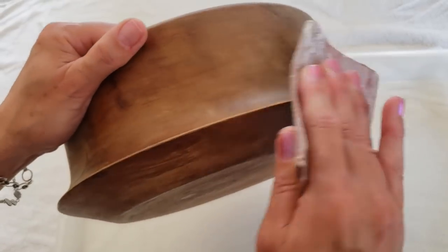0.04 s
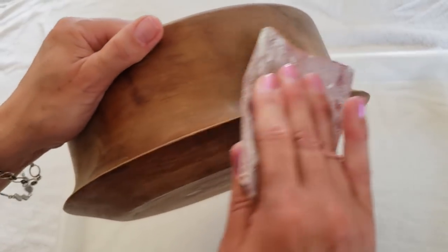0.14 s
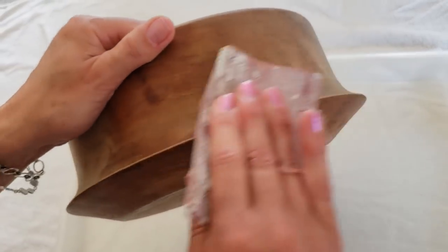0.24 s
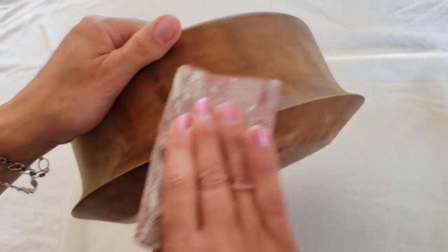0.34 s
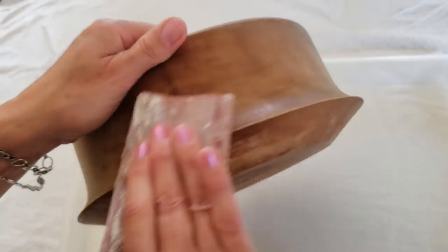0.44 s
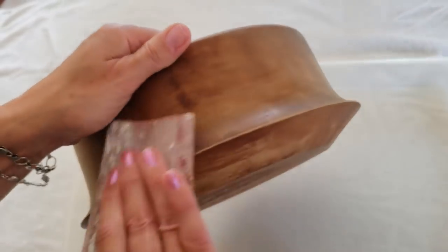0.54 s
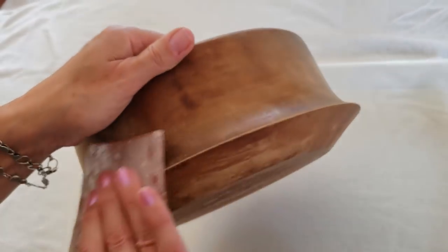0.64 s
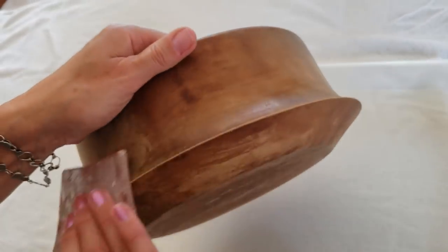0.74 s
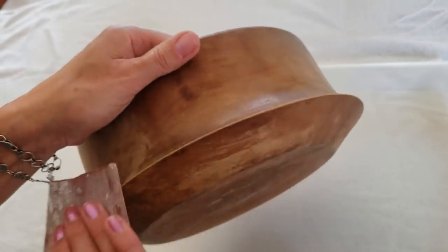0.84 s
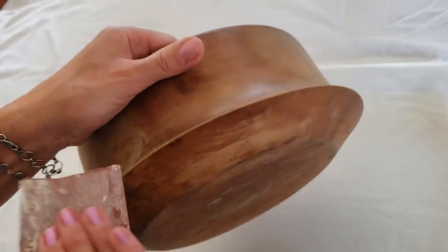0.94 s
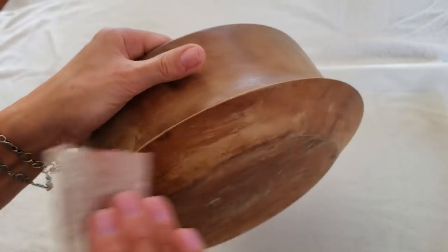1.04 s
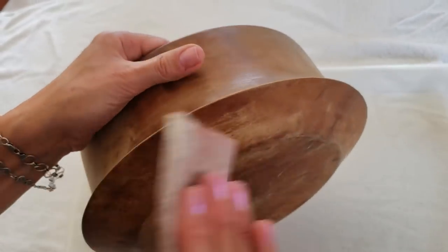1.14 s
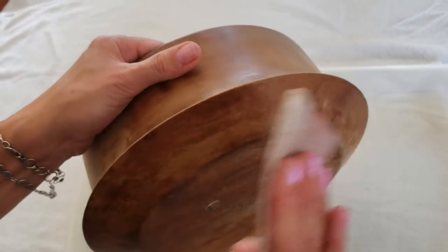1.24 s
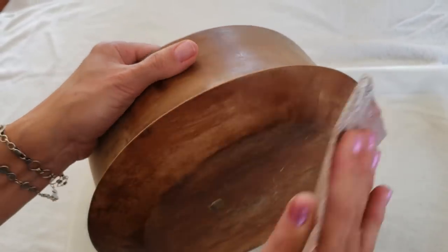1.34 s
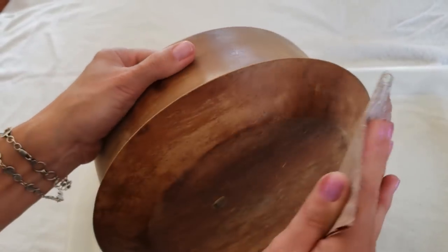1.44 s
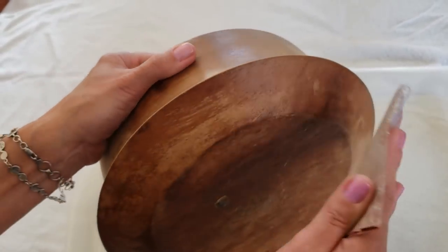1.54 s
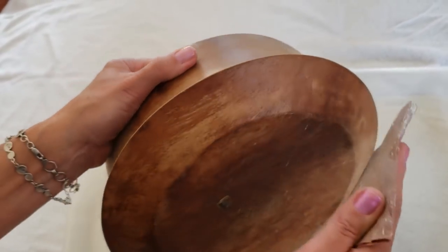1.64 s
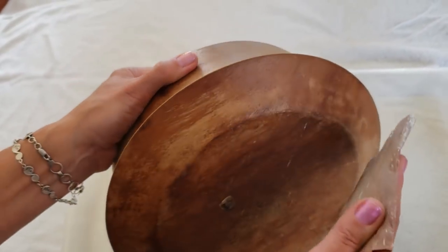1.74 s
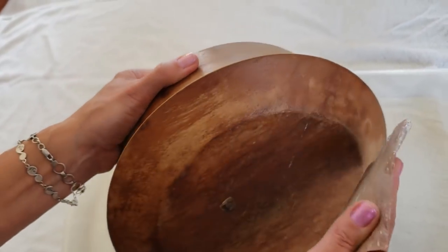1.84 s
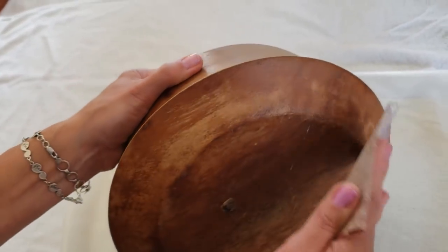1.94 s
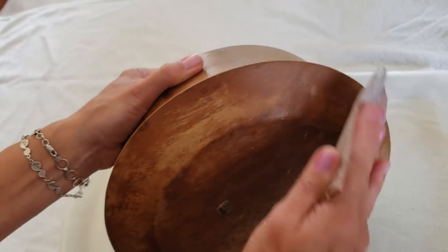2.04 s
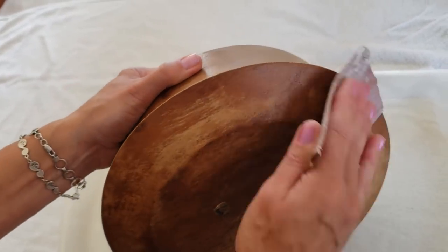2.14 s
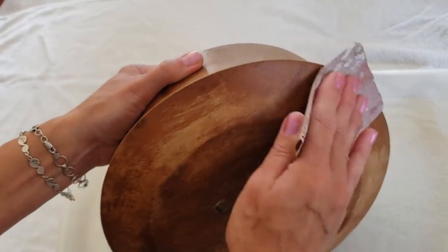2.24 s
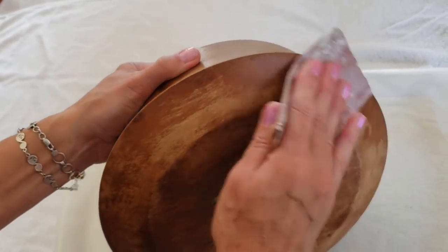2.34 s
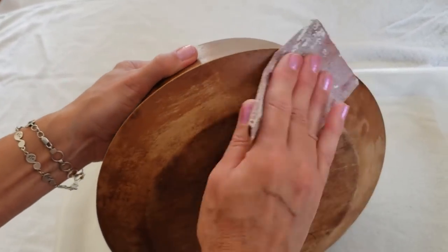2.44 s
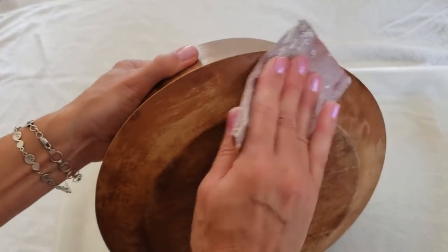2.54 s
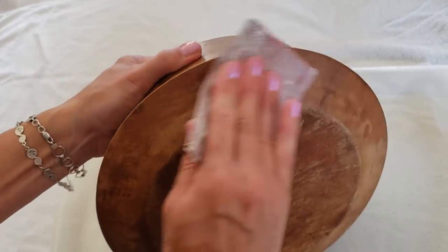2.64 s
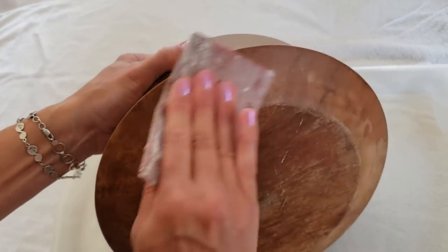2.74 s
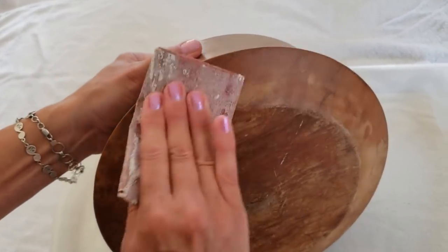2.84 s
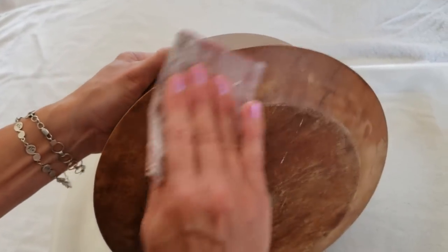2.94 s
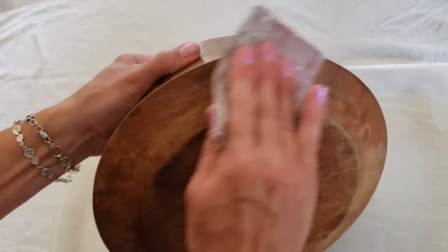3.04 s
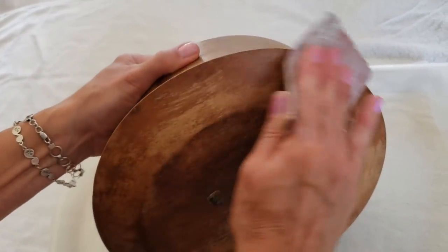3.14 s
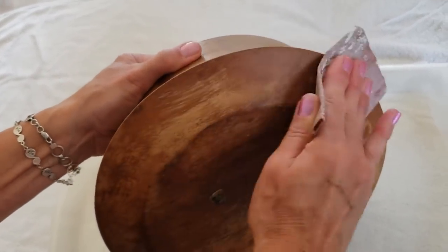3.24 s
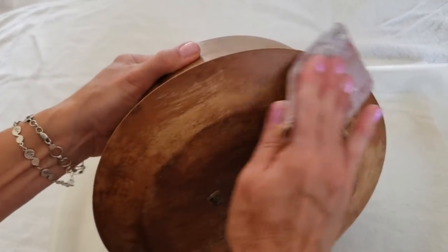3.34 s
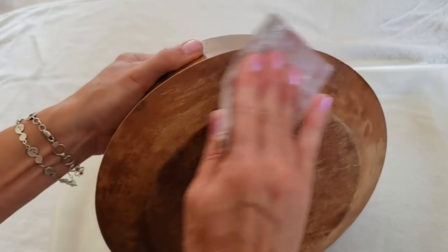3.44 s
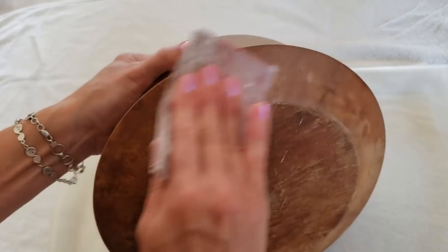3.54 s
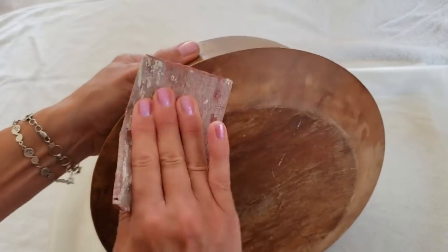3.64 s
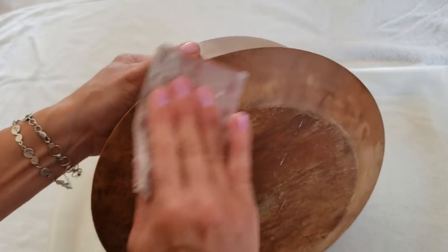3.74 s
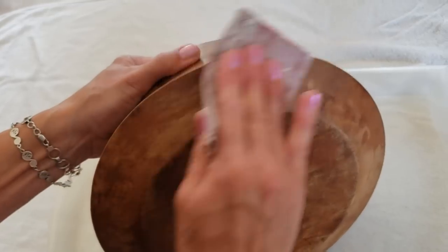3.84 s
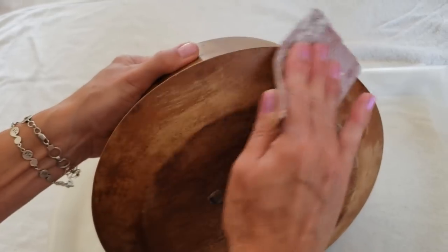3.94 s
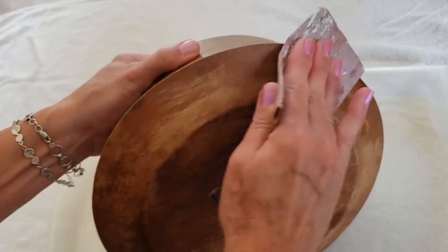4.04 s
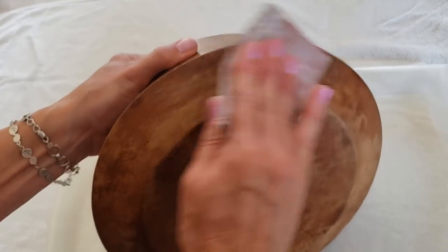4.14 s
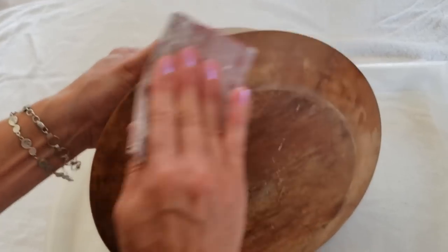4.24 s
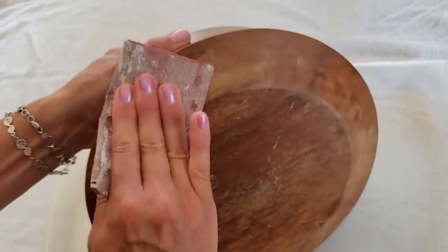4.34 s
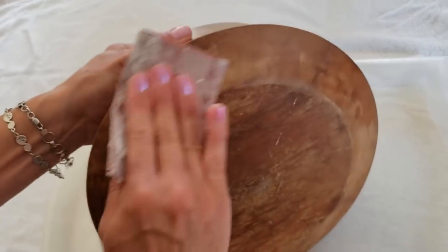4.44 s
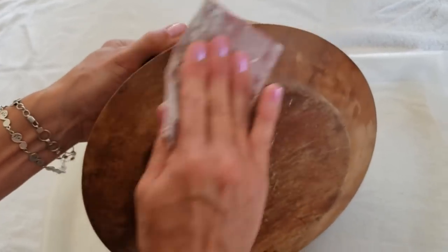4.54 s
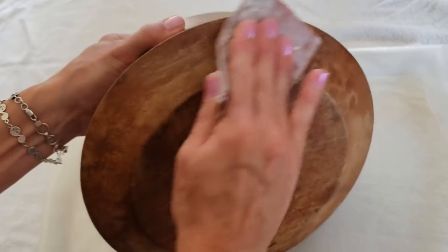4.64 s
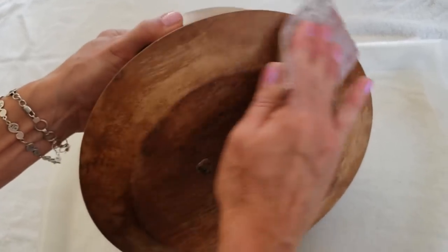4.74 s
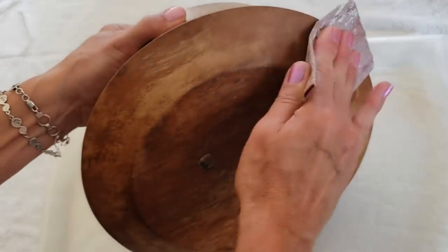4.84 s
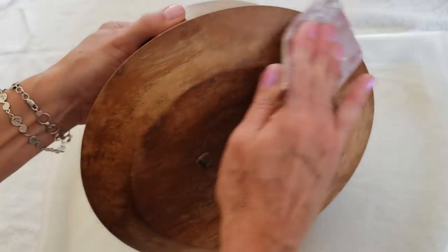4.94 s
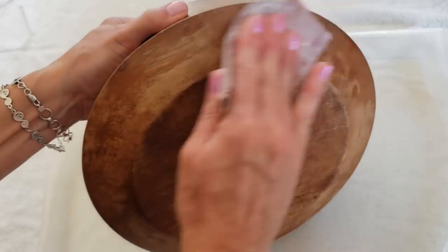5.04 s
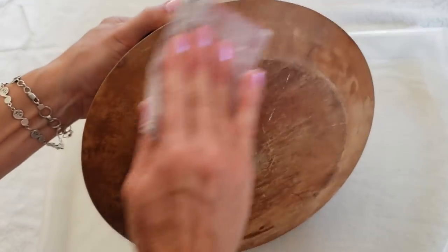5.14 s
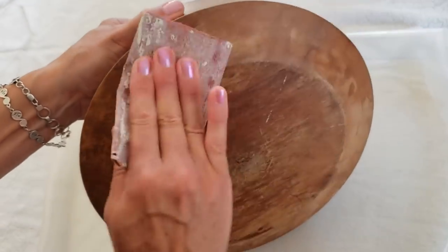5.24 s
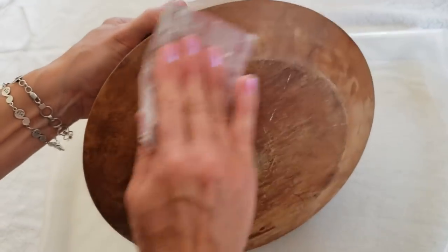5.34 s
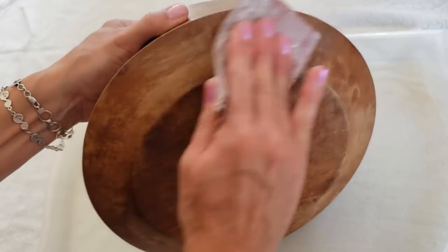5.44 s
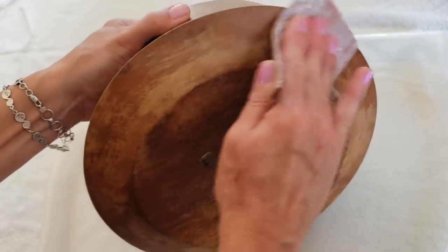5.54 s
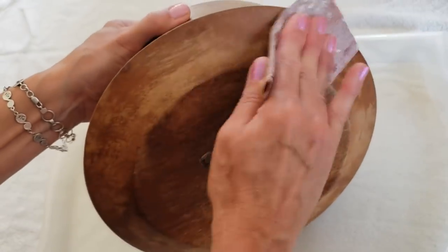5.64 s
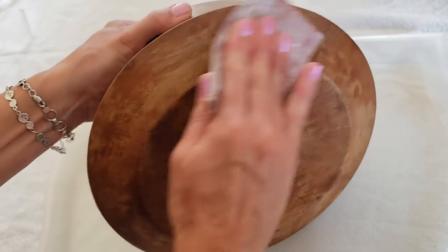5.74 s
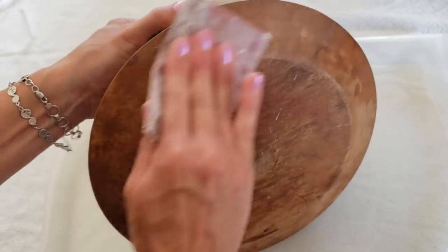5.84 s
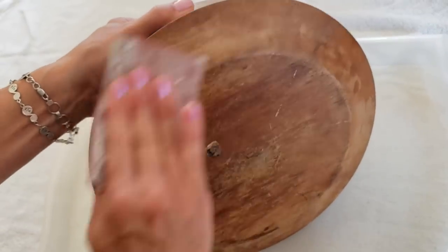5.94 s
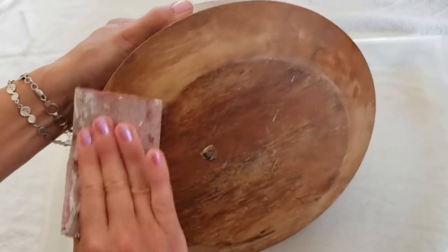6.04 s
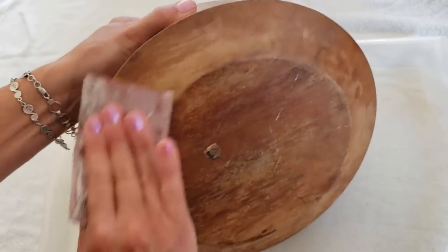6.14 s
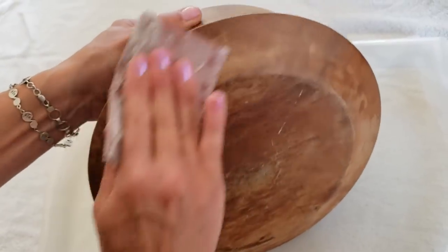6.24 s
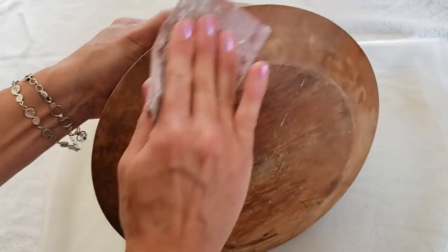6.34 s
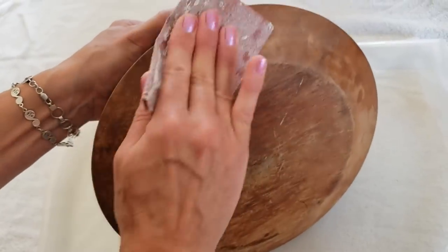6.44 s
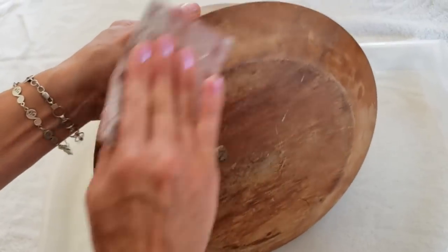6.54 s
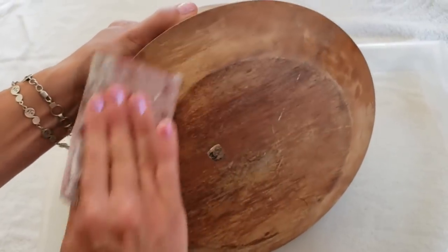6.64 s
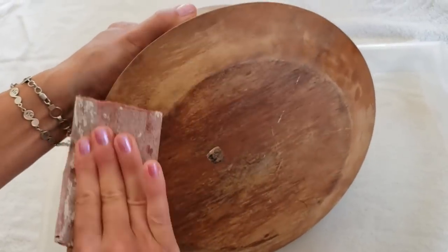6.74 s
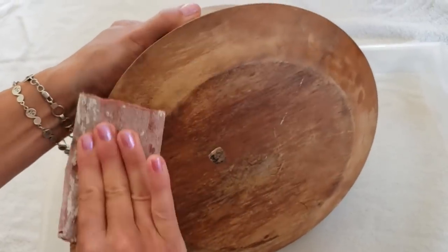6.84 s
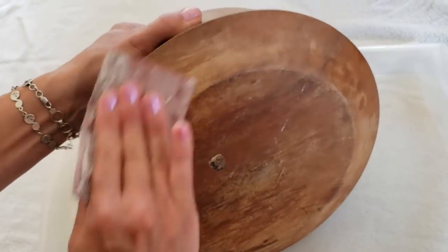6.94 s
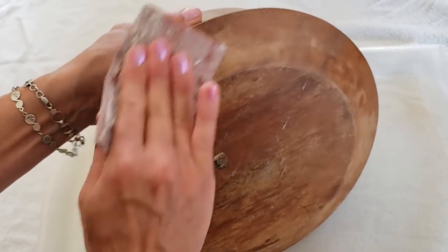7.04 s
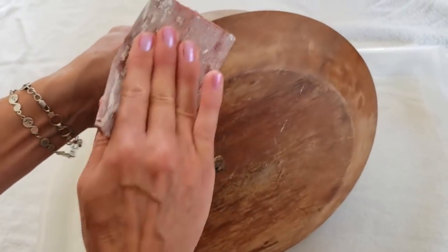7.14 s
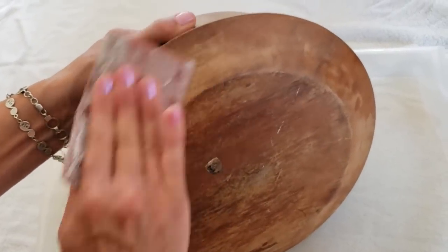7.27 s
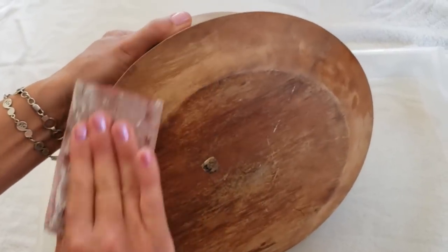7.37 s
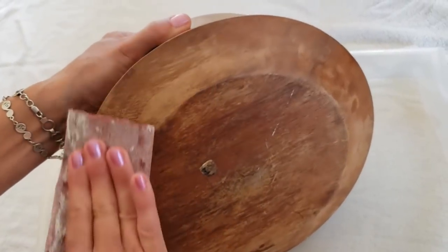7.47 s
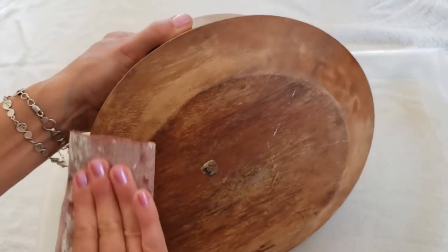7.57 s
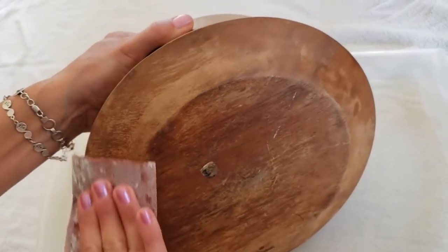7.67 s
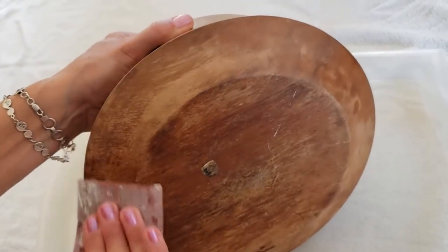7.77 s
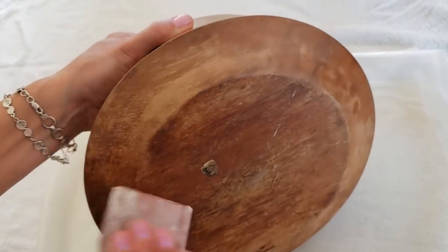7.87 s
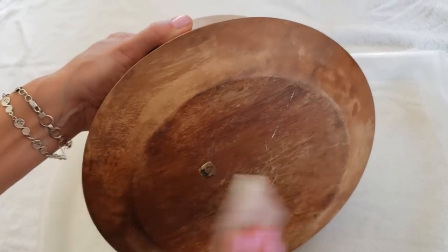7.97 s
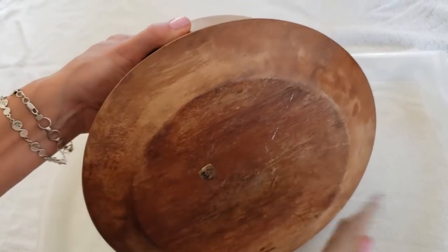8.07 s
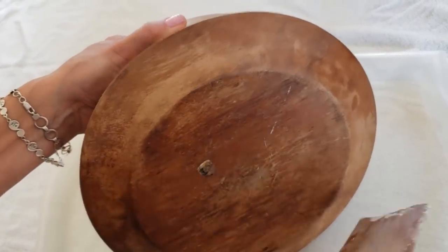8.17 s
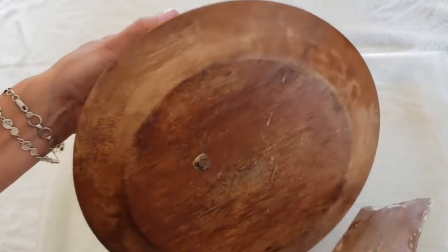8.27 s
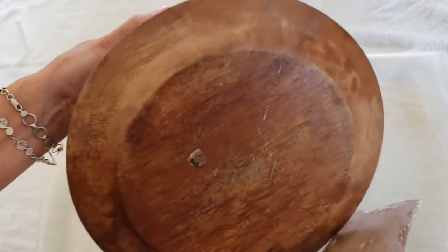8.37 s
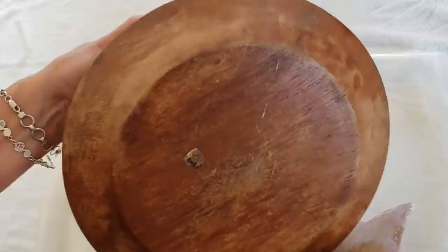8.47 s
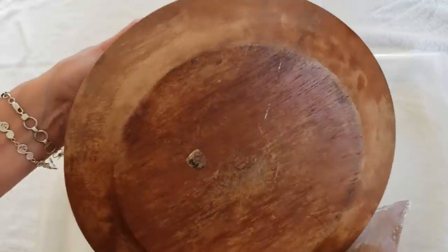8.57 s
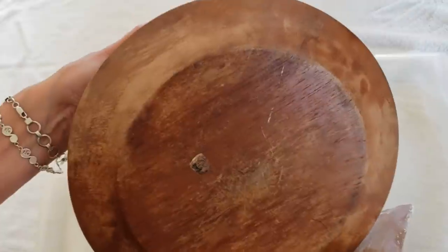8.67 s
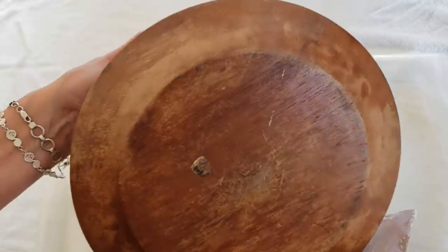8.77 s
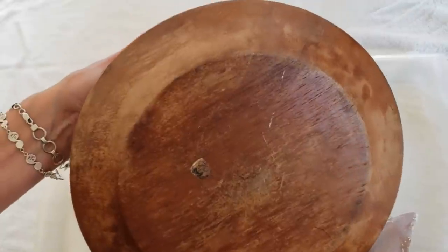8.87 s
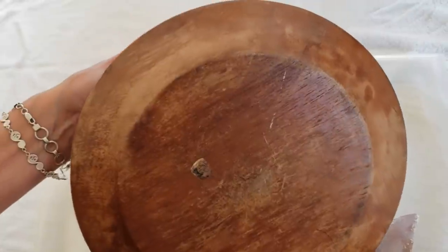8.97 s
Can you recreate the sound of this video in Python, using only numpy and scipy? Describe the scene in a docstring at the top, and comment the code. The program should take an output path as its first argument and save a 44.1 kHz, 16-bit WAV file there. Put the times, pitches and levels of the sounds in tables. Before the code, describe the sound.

Sandpaper rubs a wooden bowl by hand: one light pass, a pause, then quick, firm rasping strokes back and forth in a quiet room.

```python
"""A quiet room, stereo microphone close to a wooden bowl that is being sanded by hand.
One light pass, a pause in which the bowl is turned and bumps twice, then firm strokes to and fro along
the rim and a light pass off the edge; at the end the holding fingers slide on the wood. Grains of grit
catch and let go, driving the resonances of bowl and sheet; under the rasp lie the rumble of the hands,
room air, microphone hiss and a faint hum."""
import sys
import numpy as np
from scipy import signal
from scipy.fft import rfft, irfft, next_fast_len
from scipy.io import wavfile
from scipy.ndimage import uniform_filter1d, map_coordinates

SR = 44100
rng = np.random.default_rng(int(sys.argv[2]) if len(sys.argv) > 2 else 0)


def log_audio(samples):
    """Write samples as a 16-bit WAV file to the path given in sys.argv[1]."""
    # one column per channel
    frames = np.atleast_2d(samples).T
    # limit to full scale, then quantise
    limited = np.clip(frames, -1, 1)
    pcm = np.round(limited * 32767).astype(np.int16)
    wavfile.write(sys.argv[1], SR, pcm)


N = 397341
TIME = np.arange(N) / SR
SIZE = next_fast_len(N + SR // 2)
HZ = np.maximum(np.fft.rfftfreq(SIZE, 1 / SR), 1)


def from_db(db):
    """Decibels to gain."""
    return 10 ** (np.asarray(db) / 20)


def rms_one(x):
    """Scale so that the mean of the two channels has rms 1."""
    return x / np.sqrt(np.mean(x.mean(axis=0) ** 2) + 1e-20)


def in_time(rows):
    """Every column of a curve, sample by sample."""
    times, *columns = np.transpose(rows)
    return [np.interp(TIME, times, column) for column in columns]


def over_hz(rows):
    """Every column of a spectrum, joined on a log-frequency axis."""
    hz, *columns = np.transpose(rows)
    return np.array([np.interp(np.log(HZ), np.log(hz), column) for column in columns])


def resonance(hz, width):
    """Response of one damped mode, 1 at its peak."""
    return 1 / (1 + 1j * (HZ ** 2 - hz ** 2) / (HZ * width))


def below(hz, order):
    """Gain of a low-pass."""
    return 1 / np.sqrt(1 + (HZ / hz) ** (2 * order))


def above(hz, order):
    """Gain of a high-pass."""
    return 1 / np.sqrt(1 + (hz / HZ) ** (2 * order))


def shape(x, response):
    """Filter by a frequency response."""
    return irfft(rfft(x, SIZE) * response, SIZE)[..., :N]


def glide(x, hz, width, block=256):
    """Filter by a resonance whose centre moves, gain 1 at its peak."""
    radius = np.exp(-np.pi * width / SR)
    out, state = np.zeros_like(x), np.zeros((2, 2))
    for i in range(0, N, block):
        poles = [1, -2 * radius * np.cos(2 * np.pi * hz[i] / SR), radius ** 2]
        out[:, i:i + block], state = signal.lfilter([1, 0, -1], poles, x[:, i:i + block], zi=state)
    return out * (1 - radius ** 2) / 2


def level_evened(x):
    """Hold the level steady over 0.1 s, so that a resonance changes only the colour."""
    return x / np.sqrt(uniform_filter1d(np.mean(x ** 2, axis=0), SR // 10) + 1e-9)


def drift(rate_hz):
    """Slow random wander with spread 1."""
    slow = shape(rng.standard_normal(N), below(rate_hz, order=2))
    return slow / slow.std()


def pan(left_db):
    """Channel gains that put the left side left_db above the right."""
    return from_db(np.array([[.5], [-.5]]) * left_db)


def stereo(x, likeness):
    """Mix two unrelated signals into a left and a right that are partly alike."""
    return np.sqrt(1 + likeness) * x[0] + np.sqrt(1 - likeness) * x[1] * [[1], [-1]]


# Noise floor of room and microphone: f/Hz, relative level/dB
FLOOR_SPECTRUM = [(18, -45.5), (30, -20.5), (55, -1), (85, -8.5), (114, -11.5), (182, -15), (213, 2),
                  (256, -15), (359, -16), (389, -9.5), (622, -24.5), (1640, -23.5), (2240, -27.5),
                  (8500, -32), (15500, -26.5)]
# Its lean to the left: f/Hz, left over right/dB
FLOOR_BALANCE = [(60, 8.8), (240, 18), (950, 8.5), (3770, 5.9), (15000, 3.0)]
# Faint steady bands of microphone hiss near 1650 and 3650 Hz, plus a low band at 340 Hz:
# f/Hz, width/Hz, lift/dB
MIC_NOISE_BANDS = [(340, 70, 2), (1650, 200, 11), (3650, 600, 8)]


def noise_floor(level_db=-72.5):
    """The steady low rumble of room air under faint microphone hiss."""
    colour = from_db(over_hz(FLOOR_SPECTRUM)) * pan(over_hz(FLOOR_BALANCE))
    for hz, width, db in MIC_NOISE_BANDS:
        colour = colour * (1 + (from_db(db) - 1) * resonance(hz, width))
    noise = stereo(rng.standard_normal((2, N)), likeness=0.23)
    return from_db(level_db) * rms_one(shape(noise, colour))


# Hum in the room: f/Hz, level before trim/dB
HUM_TONES = [(118.4, -86), (215.3, -94), (355.3, -83)]


def hum(trim_db=-1.5, waver_db=5.5):
    """Faint low tones, each wavering in level and phase."""
    tones = np.zeros(N)
    for hz, db in HUM_TONES:
        amplitude = np.sqrt(2) * from_db(db + trim_db + waver_db * drift(3))
        tones += amplitude * np.sin(2 * np.pi * hz * TIME + .7 * drift(2.5))
    return tones * pan(4.9)


def room_tail(x, wet_db=-19, t60=0.23, dull_hz=5000):
    """The room answers with a short, dull tail, different on each side."""
    age = TIME[:SR // 2]
    tail = rng.standard_normal((2, len(age))) * from_db(-60 * age / t60) * (age > .005)
    tail /= np.sqrt(np.sum(tail ** 2, axis=1, keepdims=True))
    return from_db(wet_db) * shape(x, rfft(tail, SIZE) * below(dull_hz, order=1))


# The holding hand shifts its grip: t/s, half-width/s, rumble/dB, drag/dB (both before trim)
GRIP_SWELLS = [(.3, 0.046, -70, -80), (.76, 0.059, -71, -62.5), (1.01, 0.018, -68, -56.5),
               (1.25, 0.13, -68.5, -87), (1.75, 0.061, -71, -88), (2.1, 0.13, -66, -86),
               (2.42, 0.074, -61, -64), (4.3, 0.076, -68, -65.5), (6.91, 0.018, -61.5, -73),
               (7.68, 0.11, -68, -61.5), (7.95, 0.04, -67, -92), (8.5, 0.083, -72.5, -70),
               (8.9, 0.48, -74, -75.5)]


def handling(stroke_drag_db, hold_db=-77, rumble_trim_db=-2, drag_trim_db=-0.5, lumpy_db=2.5):
    """The hands shake the whole bowl: a lumpy rumble and a dull drag, swelling as the grip shifts."""
    rumble_power, drag_power = from_db(hold_db) ** 2, from_db(stroke_drag_db) ** 2
    for t, width, rumble_db, drag_db in GRIP_SWELLS:
        swell = np.exp(-((TIME - t) / width) ** 2)
        rumble_power = rumble_power + swell * from_db(rumble_db) ** 2
        drag_power = drag_power + swell * from_db(drag_db) ** 2
    shake = stereo(rng.standard_normal((2, N)), likeness=.6) * from_db(lumpy_db * drift(15))
    rumble = rms_one(shape(shake, above(43, order=3) * below(150, order=2)) * pan(9))
    body = (0.31 + 0.52 * resonance(334, 110) - resonance(523, 100)
            + 0.64 * resonance(768, 120) - 1.39 * resonance(960, 130))
    drag = rms_one(shape(shake, above(220, order=2) * below(1100, order=4) * body) * pan(16.6))
    return (rumble * np.sqrt(rumble_power) * from_db(rumble_trim_db)
            + drag * np.sqrt(drag_power) * from_db(drag_trim_db))


# The bowl bumps as it is turned, left of the microphone: t/s, relative level/dB
BOWL_BUMPS = [(1.803, -44), (1.921, -52)]
# What a bump sets ringing: f/Hz, relative level/dB, t60/s
KNOCK_MODES = [(87, 0.5, 0.59), (125, 2, 0.37), (214, -3, 0.3), (270, -7.5, 0.47), (474, 6, 0.067),
               (630, 1.5, 0.15), (783, 0.5, 0.12), (1080, -15, .1), (1505, 1, 0.043), (2120, -19, .08),
               (2360, -15, .08)]


def bumps(ring_db=-9, thud_db=-11, thud_t60=0.28, thud_hz=2200):
    """Dull knocks: decaying modes and a short, muffled thud."""
    out = np.zeros((2, N))
    age = TIME[:SR // 2]
    muffle = signal.butter(6, thud_hz, fs=SR, output="sos")
    for t, db in BOWL_BUMPS:
        ring = sum(from_db(mode_db - 60 * age / t60) * np.sin(2 * np.pi * hz * age) * rng.choice([-1, 1])
                   for hz, mode_db, t60 in KNOCK_MODES)
        noise = rms_one(signal.sosfilt(muffle, rng.standard_normal((2, len(age)))))
        thud = noise * from_db(thud_db - 60 * age / thud_t60)
        start = int(t * SR)
        out[:, start:start + len(age)] += from_db(db) * (from_db(ring_db) * ring + thud)
    return out * pan(8.5)


def grit(per_s, spread_db):
    """Grains catch and let go at random, each with its own force; the same power at any rate."""
    chance = np.clip(per_s / SR, .001, 1)
    force = from_db(spread_db * np.minimum(rng.exponential(1, (2, N)), 4))
    direction = rng.choice([-1, 1], (2, N))
    caught = rng.random((2, N)) < chance
    return rms_one(force * direction * caught / np.sqrt(chance))


def brush(curve, peaks, per_s, spread_db, left_db, likeness, top_hz, fade_s=0.0091):
    """A light sliding touch: sparse tiny slips excite a few resonances with dark valleys between."""
    level_db, = in_time(curve)
    inside_s = np.minimum(TIME - curve[0][0], curve[-1][0] - TIME)
    gate = np.clip(1 + inside_s / fade_s, 0, 1)
    body = sum(from_db(db) * resonance(hz, width) for hz, width, db in peaks)
    slips = stereo(grit(per_s, spread_db), likeness)
    sound = shape(slips, body * below(top_hz, order=2) * above(590, order=2))
    return rms_one(sound * pan(left_db)) * from_db(level_db) * gate


# Fingers on the bowl after the last stroke: t/s, level/dB
FINGER_LEVEL = [(8.41, -52), (8.418, -67), (8.436, -48), (8.578, -54.5), (8.702, -76), (8.706, -67),
                (8.792, -82), (9.0, -78)]
# The resonances they excite: f/Hz, width/Hz, relative level/dB
FINGER_MODES = [(1215, 150, 4.5), (1630, 67, 4.5), (2310, 950, -8), (3040, 610, -1), (3760, 410, -8),
                (5080, 730, -7), (6860, 280, -30), (12300, 4600, -21)]


def finger_slide():
    """The holding fingers slip over the wood."""
    return brush(FINGER_LEVEL, FINGER_MODES, per_s=3200, spread_db=3.5,
                 left_db=4.5, likeness=0.19, top_hz=10270)


# The paper's touch just before the firm strokes: t/s, level/dB
GRAZE_LEVEL = [(1.96, -80), (2.034, -63), (2.11, -55), (2.2, -68.5), (2.224, -62), (2.254, -71),
               (2.33, -57)]
# The resonances it excites: f/Hz, width/Hz, relative level/dB
GRAZE_MODES = [(1340, 140, 0), (2350, 240, 7.5), (3370, 300, 5), (4070, 420, -2), (5060, 470, 2.5),
               (14700, 3500, -10)]


def paper_graze():
    """The grit barely touches the rim."""
    return brush(GRAZE_LEVEL, GRAZE_MODES, per_s=9700, spread_db=6.0,
                 left_db=7.0, likeness=0.1, top_hz=15000)


# Grit on wood, heard close: f/Hz, left level/dB, right level/dB (both relative)
RASP_SPECTRUM = [(574, -1, -8), (970, -14, -6.5), (1280, -7, -12), (1950, -6, -13.5), (2800, -3, -1.5),
                 (3970, 2.5, -0.5), (5590, 2, 3), (6620, -8.5, -10), (7220, -6.5, -8.5),
                 (10570, -17, -14.5), (11500, -8.5, -15.5), (12860, -20.5, -14), (14500, -19.5, -7),
                 (15750, -23, -16.5)]
# Resonances of the bowl: f/Hz, width/Hz, left lift/dB, right lift/dB
BOWL_MODES = [(1149, 43, 10.5, 1), (1630, 130, 5, 2.5), (2087, 160, 5, 3.5), (2530, 510, 4.5, -0.5),
              (3245, 250, 5.5, -11.5), (3500, 220, -0.5, -0.5)]


def bowl_colour(rounding_hz=600):
    """The broad spectrum of the rasp, shaped by the bowl's modes; little radiates below the first."""
    rasp_db = uniform_filter1d(over_hz(RASP_SPECTRUM), size=int(rounding_hz * SIZE / SR))
    colour = from_db(rasp_db) * above(1060, order=12)
    for hz, width, left_db, right_db in BOWL_MODES:
        colour = colour * (1 + (from_db([[left_db], [right_db]]) - 1) * resonance(hz, width))
    return colour


# The paper's edge catches, fingers tick on the wood: t/s, relative level/dB, t60/s
SNAG_BURSTS = [(0.5474, -34, 0.035), (0.9657, -42, 0.14), (1.0043, -33, 0.083), (1.093, -46, 0.23),
               (7.92, -50, 0.25), (8.4016, -48, 0.061), (8.4307, -45, 0.06), (8.594, -44, 0.045),
               (8.651, -42, 0.037), (8.7083, -46.5, 0.038), (8.763, -58, 0.061)]
# Single coarse grains snap free: t/s, peak level before panning/dB
GRAIN_SNAPS = [(0.5457, -21), (5.6805, -25)]


def snags(burst_db=-6, top_hz=7000, wood_lift=0.93, wood_hz=2800):
    """A snag is a short burst of slips, a snap a single click; both sound through the bowl."""
    colour = bowl_colour() * below(top_hz, order=1) * (1 + wood_lift * below(wood_hz, order=4))
    colour /= np.sqrt(np.mean(abs(colour) ** 2))
    click_height = abs(irfft(colour, SIZE).mean(axis=0)).max()
    bursts, clicks = np.zeros(N), np.zeros(N)
    for t, db, t60 in SNAG_BURSTS:
        bursts += (TIME >= t) * from_db(db + burst_db - 60 * np.maximum(TIME - t, 0) / t60)
    for t, db in GRAIN_SNAPS:
        clicks[round(t * SR)] = from_db(db) / click_height
    return pan(2.5) * shape(rng.standard_normal((2, N)) * bursts + clicks, colour)


# The first pass, round the outside of the bowl: t/s, rasp/dB, wood over rasp/dB (both before trim)
OUTSIDE_PASS = [(0.0, -49, 3.5), (0.054, -51, 2), (0.082, -46.5, 1.5), (0.3, -48, 2), (0.358, -49.5, 2),
                (0.542, -48, -0.5), (0.612, -56, 2.5), (0.756, -49.5, 1), (0.862, -65.5, 6.5),
                (0.95, -66, 1)]


def light_pass(hiss_db=-4.5, sheet_hz=1840, sheet_share=0.71, lift_off_db_per_s=54):
    """Sanding controls for a light rub that fades as the paper lifts off."""
    rasp_db, wood_db = in_time(OUTSIDE_PASS)
    end = OUTSIDE_PASS[-1][0]
    lifted_db = lift_off_db_per_s * np.maximum(TIME - end, 0)
    swing_db = rasp_db - rasp_db[TIME < end].mean()
    drag_db = -64 + 0.18 * swing_db
    controls = rasp_db - lifted_db, wood_db, hiss_db, drag_db - lifted_db, sheet_hz, sheet_share
    return np.array(np.broadcast_arrays(*controls))


def hand_speed_db(start, stop, bite_db, attack, brake_s=0.038, creep_db=-16.5, creep_s=0.079):
    """The paper bites at once, gathers speed, holds it, then brakes and creeps to a stop."""
    bite, creep = from_db(bite_db), from_db(creep_db)
    power = np.maximum(1.134 - 0.04 * (bite_db + 19), .5)   # the weaker the bite, the gentler the rise
    rise = np.sin(np.pi / 2 * np.clip((TIME - start) / attack, 0, 1)) ** power
    late = np.maximum(TIME - stop, 0)
    fall = (1 - creep) * np.exp(-(late / brake_s) ** 2) + creep * np.exp(-late / creep_s)
    return 20 * np.log10((bite + (1 - bite) * rise) * fall + 1e-9)


# Strokes along the rim, close to the microphone (levels before trim): start t/s, braking t/s,
# bite re full speed/dB, attack/s, easing t/s, easing depth/dB, first push/dB, second push/dB,
# wood over rasp in the first push/dB, in the second/dB, hiss over rasp/dB, drag/dB,
# sheet resonance f/Hz, its share/0-1
RIM_STROKES = [(2.311, 2.544, -24, 0.12, 2.47, 6.5, -39.0, -54.0, 1.0, 4, -9, -66, 2260.0, 0.2),
               (2.554, 2.815, -16.0, 0.096, 2.786, 5.5, -33.5, -31.5, -4, -6, -4.5, -62.0, 2460, 0.44),
               (2.941, 3.204, -14, 0.091, 3.082, 4, -31.5, -33.0, -8.5, -4.5, -1.5, -64, 2280, 0.36),
               (3.326, 3.621, -21.5, 0.11, 3.5, 2.0, -30.5, -32.5, -0.5, -6.5, -4.5, -60.5, 2410, 0.66),
               (3.755, 3.961, -23.5, 0.067, 3.879, 1.5, -33.0, -36.0, -8, -4.5, -2.0, -66.5, 2370, 0.47),
               (4.093, 4.337, -18.5, 0.098, 4.33, 7, -33.5, -34, -3.5, -3, -3.5, -65.5, 2320, 0.26),
               (4.459, 4.801, -20.5, 0.06, 4.66, 4.0, -35.0, -34, -6.5, -2.5, -2.5, -61.5, 2450.0, 0.75),
               (4.918, 5.205, -21.0, 0.11, 5.107, 1.0, -34.0, -33, 1.0, -4.5, -3.5, -64, 2470, 0.56),
               (5.346, 5.563, -22.5, 0.08, 5.48, 4.0, -32, -36.5, -8.5, -3.5, -2, -65.5, 2450, 0.76),
               (5.677, 6.031, -13.5, 0.087, 5.878, 4.5, -33.5, -32.5, -0.5, -5, -3, -67.0, 2480.0, 0.8),
               (6.16, 6.371, -21, 0.12, 6.307, 5.5, -31, -39.0, -6.5, -4.5, 0, -60, 2170, 0.35),
               (6.491, 6.747, -21.0, 0.087, 6.663, 0.5, -35.5, -39.5, -4.0, 0, -2, -62.0, 2140, 0.6),
               (6.887, 7.101, -23.0, 0.094, 7.02, 2, -35.0, -41.5, -4, -2, 0.5, -59, 2140, 0.5),
               (7.218, 7.822, -25.5, 0.12, 7.5, 5.5, -39, -47.5, -2, -0.5, -1.5, -64, 2110, 0.28)]


def firm_strokes(ease_share=0.16, sag_hz_per_s=250):
    """Sanding controls: each stroke pushes, eases over the curve of the rim, then bears down again."""
    strokes = np.array(RIM_STROKES)
    current = np.maximum(np.searchsorted(strokes[:, 0], TIME, side="right") - 1, 0)
    (start, stop, bite_db, attack, ease_at, ease_db, first_db, second_db,
     first_wood_db, second_wood_db, hiss_db, drag_db, sheet_hz, sheet_share) = strokes[current].T
    speed_db = hand_speed_db(start, stop, bite_db, attack)
    past_easing = (TIME - ease_at) / (ease_share * (stop - start))
    second_push = (1 + np.tanh(past_easing)) / 2
    easing_db = ease_db * np.exp(-past_easing ** 2)
    push_db = (second_db - first_db) * (second_push - .5) - easing_db
    rasp_db = (first_db + second_db) / 2 + push_db + speed_db
    drag_db = drag_db + 0.54 * speed_db
    wood_db = first_wood_db + (second_wood_db - first_wood_db) * second_push
    # a slower or lighter rub is duller: more wood, less hiss
    wood_db = wood_db + 0.18 * easing_db - 0.16 * speed_db
    hiss_db = hiss_db + 0.57 * push_db + 0.23 * speed_db
    # the sheet's resonance sinks as the fingers flatten it
    sheet_hz = sheet_hz - sag_hz_per_s * (np.clip(TIME, start, stop) - (start + stop) / 2)
    return np.array([rasp_db, wood_db, hiss_db, drag_db, sheet_hz, sheet_share])


def stroke_controls(give_s=.011):
    """The light pass, then the firm strokes; the soft fingers round off every sudden change."""
    controls = np.where(TIME < RIM_STROKES[0][0], light_pass(), firm_strokes())
    return uniform_filter1d(controls, size=int(give_s * SR), axis=-1)


# Paths to the microphone off bowl and table: delay/ms, change over a stroke/ms, level re direct/dB
ECHO_PATHS = [(.9, 0.34, -25), (2.3, .6, -24.5), (4.1, .5, -12.5), (7.5, .6, -13)]


def reflections(x):
    """The hand swings from end to end of its path, so the echoes slide and ripple the spectrum."""
    starts = [stroke[0] for stroke in RIM_STROKES]
    turns = [OUTSIDE_PASS[0][0], OUTSIDE_PASS[-1][0], *starts, RIM_STROKES[-1][1]]
    place = np.cos(np.pi * np.interp(TIME, turns, np.arange(len(turns)))) / 2
    out = x.copy()
    for k, (delay_ms, swing_ms, db) in enumerate(ECHO_PATHS):
        for side in (0, 1):
            lag = (delay_ms + (-1) ** (k + side) * swing_ms * place) * SR / 1000
            out[side] += from_db(db) * map_coordinates(x[side], [np.arange(N) - lag], order=2)
    return out


# How alike the bowl sounds on the two sides of the microphone: f/Hz, likeness/0-1
BOWL_LIKENESS = [(900, 0.14), (1200, 0.86), (1600, .4), (2200, 0.28), (3000, 0.044)]


def sanding(rasp_db, wood_db, hiss_db, sheet_hz, sheet_share, wood_edge_hz=3200, hiss_edge_hz=6300,
            wood_trim_db=0.5, rasp_trim_db=-1.0, hiss_trim_db=1.5, judder_db=0.32, flicker_db=0.5):
    """Firmer, faster strokes tear more fibres; the grains drive the wood, the paper and a fine hiss."""
    force = from_db(rasp_db + judder_db * drift(70))
    grains_per_s = 22000 * from_db((rasp_db + 38) / 2)
    grains = reflections(grit(grains_per_s, spread_db=2.5))
    colour = bowl_colour()
    # the bowl radiates as one body, the grains from all over the sheet
    body_spectrum = stereo(rfft(grains, SIZE), over_hz(BOWL_LIKENESS))
    wood = irfft(body_spectrum * colour * below(wood_edge_hz, order=10), SIZE)[:, :N]
    mode_hz = sheet_hz + 40 * drift(6)
    sheet_mode = 1.53 * sheet_share * pan(1.7) * glide(wood, mode_hz, width=280)
    wood = level_evened(wood + sheet_mode)
    # 1j shifts the middle band a quarter cycle, so the bands add in power where they overlap
    rasp = shape(grains, colour * above(wood_edge_hz, order=10) * below(hiss_edge_hz, order=10) * 1j)
    sheet_overtone = 0.45 * sheet_share * glide(rasp, 2.1 * mode_hz, width=380)
    rasp = level_evened(rasp + sheet_overtone)
    hiss = shape(grains, colour * above(hiss_edge_hz, order=10))
    bands = [(wood, wood_db + wood_trim_db), (rasp, rasp_trim_db), (hiss, hiss_db + hiss_trim_db)]
    return force * sum(rms_one(band) * from_db(db + flicker_db * drift(17)) for band, db in bands)


def scene():
    """Hands, paper and bowl close to the microphone, the quiet room behind them."""
    rasp_db, wood_db, hiss_db, drag_db, sheet_hz, sheet_share = stroke_controls()
    touches = paper_graze() + finger_slide()
    strokes = sanding(rasp_db, wood_db, hiss_db, sheet_hz, sheet_share)
    close = touches + strokes + handling(drag_db) + snags() + bumps()
    return close + room_tail(close) + noise_floor() + hum()


def record(dry):
    """The treble is cut steeply just under 16 kHz."""
    return shape(dry, below(15950, order=200) ** 2)


dry = scene()
out = record(dry)
log_audio(out)
```